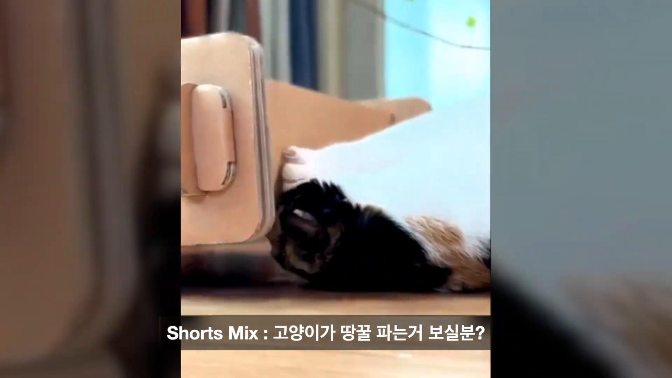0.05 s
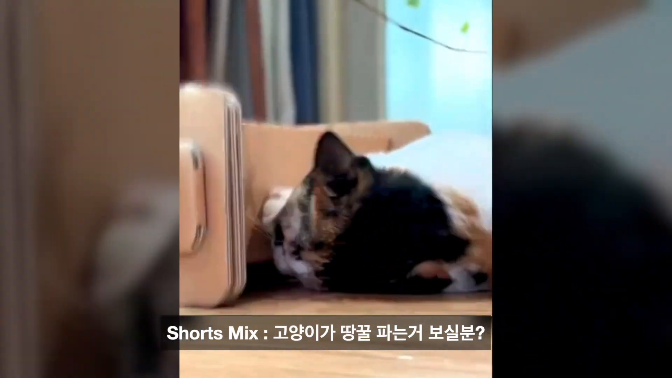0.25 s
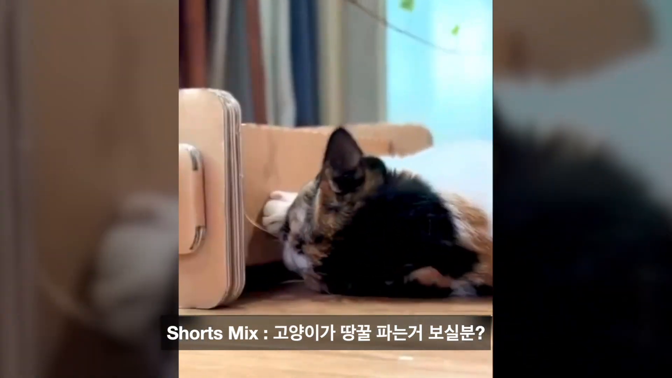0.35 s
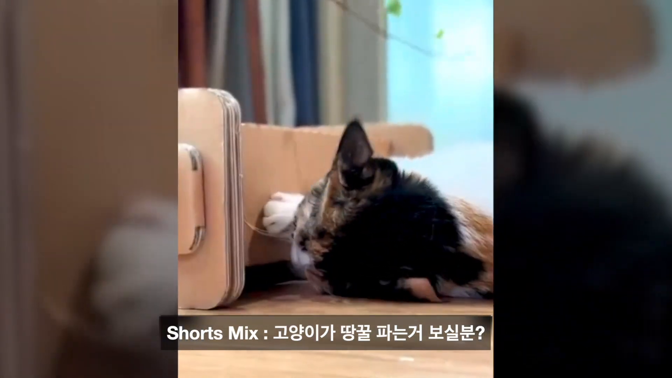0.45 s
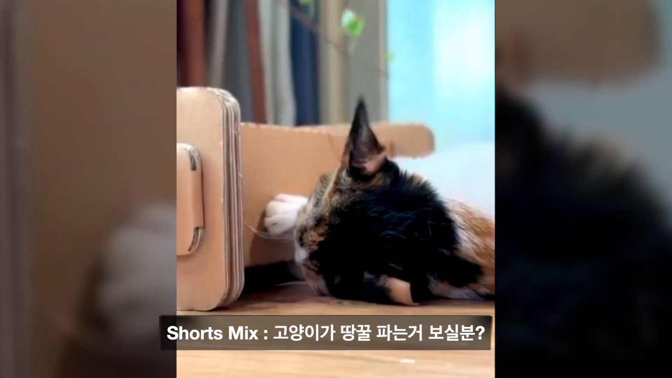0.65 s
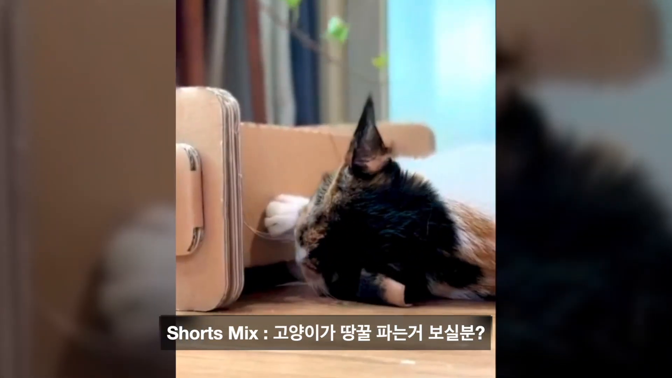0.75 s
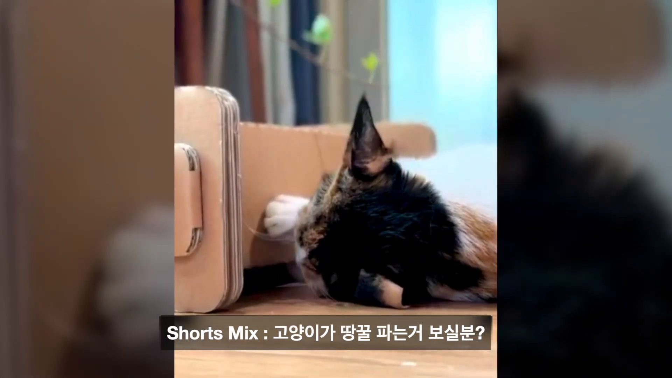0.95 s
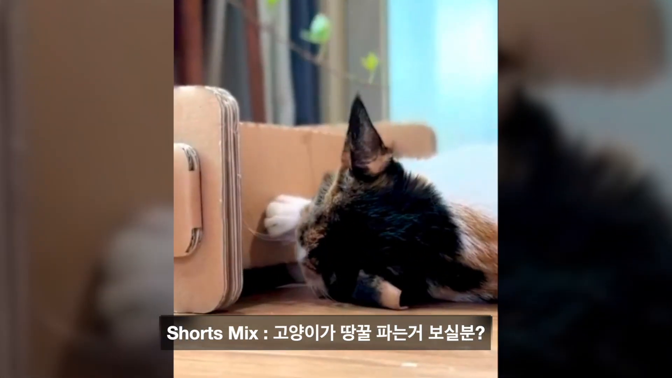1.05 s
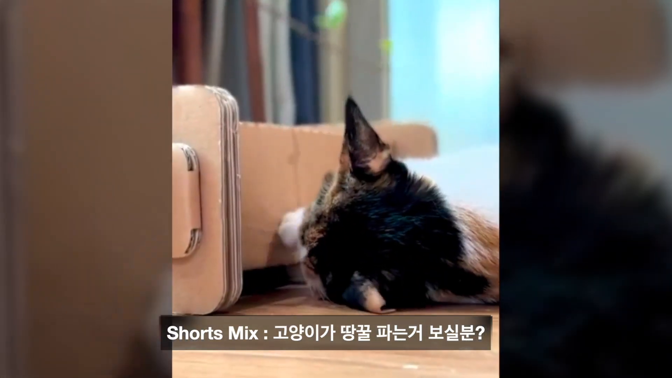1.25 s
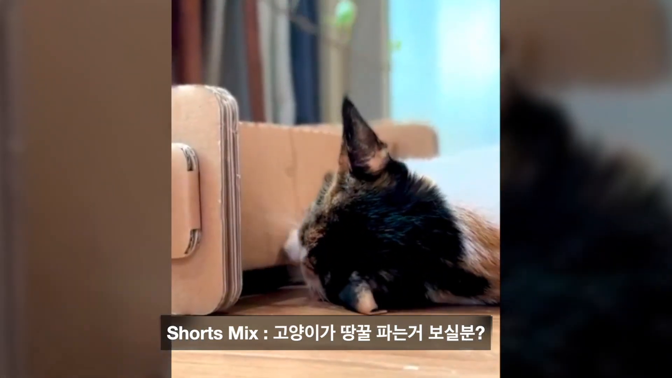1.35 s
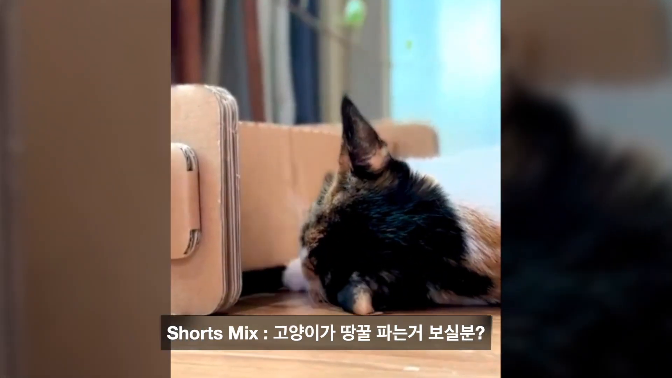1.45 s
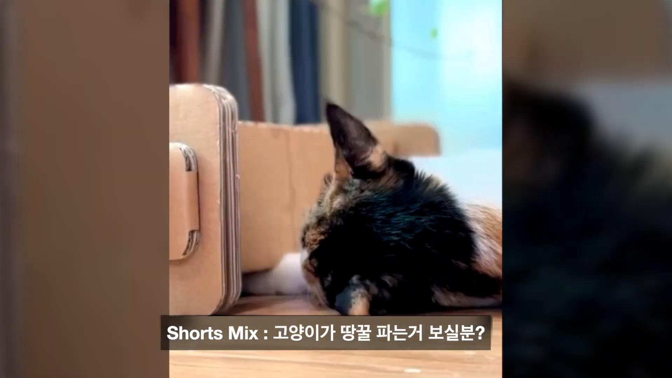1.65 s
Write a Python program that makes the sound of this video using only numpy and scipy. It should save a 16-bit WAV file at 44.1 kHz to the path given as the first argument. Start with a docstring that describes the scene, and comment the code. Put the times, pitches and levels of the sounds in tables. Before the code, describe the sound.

One hollow cardboard thump dominates early, led in by a quick rough claw drag, then fading into soft low bumps, fur rustle and a faint late tap; close microphone, small room, low room tone.

```python
"""Cat's paw knocks a cardboard box

A cat lying on a wooden floor drags a paw over a cardboard box, which knocks once, hollow and loud.
The knock is a cluster of contacts: a bend runs through the panel treble first, the panel modes ring,
and a short low sine is the hollow booming, which beats on in wavering low tones; so do soft bumps.
Scraping and fur are dense noise grains, claw ticks are resonant bursts; one light tap is a filtered
click. A small room of decaying noise answers, and a faint room tone lies beneath.
"""
import sys
import numpy as np
from scipy import signal
from scipy.fft import rfft, irfft, next_fast_len
from scipy.io import wavfile

SR = 44100
rng = np.random.default_rng(int(sys.argv[2]) if len(sys.argv) > 2 else 0)


def generate_wav(signal):
    """Clip the signal to [-1, 1] and save it as 16-bit WAV at the path in sys.argv[1]."""
    frames = np.transpose(np.atleast_2d(signal))
    scaled = np.clip(frames, -1, 1) * 32767
    pcm = np.round(scaled).astype(np.int16)
    wavfile.write(sys.argv[1], SR, pcm)


N = 74970
T = np.arange(N) / SR  # time axis, s
SIZE = next_fast_len(2 * N)  # transform length, padded
F = np.maximum(np.arange(SIZE // 2 + 1) * SR / SIZE, 1)  # frequency axis, Hz
BOOM_HZ = 83


def undb(db):
    """Decibels to gain."""
    return 10 ** (np.asarray(db) / 20)


def read(table, hz=F):
    """Read a two-column table, interpolating on a log-frequency axis."""
    f, v = np.array(table, float).T
    return np.interp(np.log(hz), np.log(f), v)


def through(x, response):
    """Filter by a frequency response."""
    return irfft(rfft(x, SIZE) * response, SIZE)[..., :N]


def causal(db):
    """Minimum-phase response with the given gain, by folding the cepstrum."""
    cepstrum = irfft(np.log(undb(db)), SIZE)
    cepstrum[1:SIZE // 2] *= 2
    cepstrum[SIZE // 2 + 1:] = 0
    return np.exp(rfft(cepstrum))


def delay(s):
    """Frequency response of a delay in seconds."""
    return np.exp(-2j * np.pi * F * s)


def unit(x):
    """Scale to rms 1."""
    return x / np.sqrt(np.mean(x ** 2))


def pan(db):
    """Left and right gains for a level difference, left over right."""
    return undb(np.array([[.5], [-.5]]) * db)


def ports(x):
    """Sound from the box reaches the left channel first."""
    right_lag_s = .00016
    return through(x, np.array([delay(0), delay(right_lag_s)]))


def diffuse(pair):
    """Mix two unrelated signals into a stereo field, alike in the bass and wide above."""
    # likeness of the two channels: f/Hz, correlation
    likeness = [(60, 1), (150, 0.9), (300, 0.8), (600, 0.09), (1200, -0.27), (2500, -0.19), (6000, 0.19)]
    c = np.clip(read(likeness), -.99, .99)
    mid, side = through(pair, np.sqrt(np.array([1 + c, 1 - c]) / 2))
    return np.array([mid + side, mid - side])


def noise():
    """Diffuse white noise."""
    return diffuse(rng.standard_normal((2, N)))


def fade(t60):
    """Exponential decay by 60 dB in t60 seconds."""
    return np.exp(-np.log(1000) * T / t60)


def echoes(t60):
    """Envelope of reflections: a gap, a quick rise and a decay, scaled to unit energy."""
    first_echo_s = 0.0016
    env = fade(t60) * np.clip(T / first_echo_s - 1, 0, 1)
    return env / np.sqrt(np.sum(env ** 2))


def room(x, wet_db=0):
    """Add quick reflections off floor and box, and a small room's tail decaying band by band."""
    # tail spectrum: f/Hz, level/dB
    tail = [(60, -11.5), (200, -15), (600, -11), (1100, -5.5), (1900, -11), (7000, -12)]
    # tail decay time: f/Hz, t60/s
    tail_t60 = [(80, 1), (250, 0.35), (900, 0.34), (2000, 0.24), (8000, 0.17)]
    early_db, early_t60_s = -12, .085
    response = undb(early_db) * noise() * echoes(early_t60_s)
    wash = noise()
    centres = np.geomspace(50, 12800, 9)  # Hz
    for hz, share in zip(centres, np.eye(len(centres))):
        # overlapping triangular bands
        band = through(wash, np.interp(np.log(F), np.log(centres), share))
        response = response + band * undb(read(tail, hz)) * echoes(read(tail_t60, hz))
    return x + undb(wet_db) * through(x, rfft(response, SIZE))


def crunch(db):
    """Fibres crushing at a contact smear its treble into brief crackle, keeping the colour."""
    decay_s, lower_edge_hz = 0.004, 1772
    fibres = unit(noise() * np.exp(-T / decay_s)) / np.sqrt(N)
    treble = 1 / (1 + lower_edge_hz / (1j * F)) ** 2
    # the click plus its crackle, at db against the click before the treble filter
    smear = 1 + undb(db) * rfft(fibres, SIZE) * treble
    # divide out the gain so that only the smearing in time remains
    return np.array([side / causal(20 * np.log10(np.abs(side))) for side in smear])


def friction(level, spectrum, rough_db=0.9, catch_hz=45):
    """Dense tiny slips of uneven size; the pressure of the stroke wavers as the paw catches."""
    grains_per_s, scatter_db, pan_db = 9000, 2.5, 0.66
    slips = (rng.random(N) < grains_per_s / SR) * undb(scatter_db * rng.standard_normal(N))
    grains = diffuse(slips * rng.standard_normal((2, N)))
    grains = unit(through(grains, causal(read(spectrum))))
    catch = unit(through(rng.standard_normal(N), 1 / (1 + (F / catch_hz) ** 2)))
    stroke_db = np.interp(T, *np.array(level).T) + rough_db * catch
    return grains * undb(stroke_db) * pan(pan_db)


def air():
    """Steady low room tone with a faint hiss: diffuse noise, coloured."""
    # room tone colour: f/Hz, relative level/dB
    colour = [(20, -9), (60, 2.5), (110, -3), (200, -4.5), (500, -11.5), (900, -23), (1500, -26),
              (2500, -35), (5300, -41.5), (6400, -33.5), (6900, -26.5), (7400, -44.5), (8500, -45),
              (11500, -35.5)]
    rms_db = -59
    return undb(rms_db) * unit(through(noise(), undb(read(colour))))


def scrape():
    """The paw scrapes the board: friction grains strongest in the low mids."""
    # stroke: t/s, level/dB
    stroke = [(0, -68.5), (.07, -59.5), (.12, -59.5), (.17, -49.5), (.235, -54), (.3, -48.5), (.5, -58.5),
              (.61, -61), (.7, -64.5), (.77, -63), (.9, -62.5), (1.0, -76.5), (1.12, -66.5), (1.3, -76.5),
              (1.5, -74), (1.6, -64.5), (1.7, -60)]
    # scrape colour: f/Hz, relative level/dB
    colour = [(80, -8.5), (300, -1), (650, 4), (1100, 0.5), (1450, -2), (1900, -4.5), (2400, -6),
              (3300, -22), (5000, -17), (12000, -37)]
    return friction(stroke, colour)


def fur():
    """Fur rustles: the same fine slips, strongest in the treble."""
    # rustle: t/s, level/dB
    rustle = [(0, -68.5), (.08, -67), (.17, -61), (.23, -54), (.3, -50.5), (.38, -64), (.46, -63.5),
              (.57, -68), (.64, -67.5), (.73, -78), (.82, -66), (.89, -64.5), (1.02, -71), (1.25, -75),
              (1.48, -79.5), (1.62, -70.5), (1.7, -70.5)]
    # fur colour: f/Hz, relative level/dB
    colour = [(1000, -12.5), (2500, 1), (4000, 0.5), (5200, -4), (6800, 5.5), (8000, 0), (9300, -12.5),
              (11000, -1.5), (13000, -33.5)]
    return friction(rustle, colour)


def drag():
    """The claws bite, slide roughly over the cardboard and let go as the box knocks."""
    # claw colour: f/Hz, relative level/dB
    colour = [(300, -5.5), (700, -5), (1200, -6.5), (1700, -3), (2300, 4.5), (2750, -1.5), (3300, -14.5),
              (4000, -11.5), (4800, -22), (12000, -23.5)]
    start_s, end_s, ramp_s, slide_db = 0.08, 0.21, 0.057, -54
    # t/s, level/dB
    stroke = [(start_s - ramp_s, -72), (start_s, slide_db - 6), (start_s + ramp_s, slide_db),
              (end_s, slide_db), (end_s + ramp_s, -100)]
    return friction(stroke, colour, rough_db=3.7)


def ticks(q=1.2):
    """A claw catches or scuffs, or the box gives a soft low bump: a short burst of crackle in one broad
    resonance."""
    # claw ticks and short scuffs, with soft low bumps at 0.032 s and 0.39 s: t/s, level at onset/dB, centre
    # f/Hz, decay constant/s
    tick_bursts = [(0.032, -48.5, 514, 0.011), (.0975, -38, 2000, .0025), (.2305, -52, 5000, .003),
                   (.7535, -55, 1400, .004), (.39, -49.5, 533, 0.028), (0.444, -62, 5000, .003),
                   (0.5295, -55, 5600, 0.0073), (0.6424, -59.5, 4200, 0.0063), (0.8735, -60, 5026, .005),
                   (1.2457, -60, 7760, 0.0024)]
    out = 0
    for s, db, hz, length in tick_bursts:
        resonance = 1 / (1 + 1j * q * (F / hz - hz / F)) ** 2
        burst = rng.standard_normal(N) * (T >= s) * np.exp(-np.abs(T - s) / length)
        # rms of a decay that starts at 1, so the level holds at the onset
        decay_rms = np.sqrt(length / 2 * SR / N)
        out = out + undb(db) * unit(through(burst, resonance)) * decay_rms
    return room(ports(out), wet_db=-0.5)


def low_swells(waver=0.11):
    """Low, unsteady swells: the knock's boom beating on after the hit, and soft padded bumps."""
    # boom beats and soft bumps: t/s, peak level/dB, centre f/Hz, time to peak/s
    swells = [(0.035, -50, 253.5, 0.017), (.2, -40.5, 90, 0.028), (0.313, -34.5, 89, .013),
              (0.341, -32, 85.4, 0.013), (.385, -39.5, 88, 0.01), (0.455, -47.5, 79.1, .018),
              (.535, -50, 225, 0.0097), (.568, -45, 93, 0.0083), (.765, -48.5, 77, 0.0093),
              (.875, -61.5, 185, 0.041), (1.08, -52.5, 70.3, 0.01), (1.345, -62, 59.8, 0.011),
              (1.437, -58, 60.4, 0.033)]
    out = 0
    for s, db, hz, length in swells:
        age = np.maximum(T - s, 0) / length
        envelope = age ** 2 * np.exp(2 * (1 - age))
        drift = unit(through(rng.standard_normal(N), 1 / (1 + (2 * F / hz) ** 2)))
        pitch = hz * (1 + waver * drift)
        tone = np.sin(2 * np.pi * np.cumsum(pitch * (T >= s)) / SR)
        out = out + undb(db) * envelope * tone
    return ports(out)


def knock():
    """Contacts crunch, spread into a falling chirp as they bend the panel, and its modes ring on."""
    # the knock and the box chattering as it settles: t/s, level/dB
    hits = [(.2430, -1.5), (0.2449, -12.5), (.2518, -14), (0.2612, -17.5), (.2685, -22.5), (0.2773, -17.5),
            (.2815, -18.5)]
    # colour of the blow: f/Hz, level/dB
    colour = [(25, 1), (60, 15.5), (120, 29), (250, 30.5), (500, 21.5), (850, 23.5), (1500, 16),
              (2400, 10.5), (3400, -5), (6000, 0), (11500, -9)]
    # stereo place of the blow: f/Hz, left over right/dB
    place = [(100, 1.5), (800, 2.5), (1400, -3.5), (2300, 6.5), (3500, 11.5), (7000, 1)]
    # panel modes: f/Hz, level over the blow/dB, t60/s
    modes = [(126.4, 0, 0.56), (169, 5, 0.18), (259.4, 2, 0.23), (305.2, 0, .2), (383, 4, 0.078),
             (491.3, 0.5, 0.22), (573, 2, .24), (724, 0.5, 0.33), (812.5, 7, 0.12), (922.5, -1, 0.24),
             (1009, 0.5, 0.25), (1150, -7, 0.19), (1323, -3, 0.095), (1525, -0.5, .09), (1841, -1, 0.13),
             (2242, -2.5, .12), (2396, -4.5, 0.11)]
    # travel time at 1 kHz; lower tones come later by this power, down to the boom
    bend_delay_s, bend_law = .0033, .52
    travel = bend_delay_s * (np.maximum(F, BOOM_HZ) / 1000) ** -bend_law
    # summing the delay over frequency gives the phase
    bend = np.exp(-2j * np.pi * np.cumsum(travel) * SR / SIZE)
    contacts = sum(undb(db) * delay(s) for s, db in hits)
    panel = 1  # the blow itself, then each mode
    for hz, db, t60 in modes:
        q = np.pi * hz * t60 / np.log(1000)
        panel = panel + undb(db) / (1 + 1j * q * (F / hz - hz / F))
    blow = causal(read(colour)) * contacts * crunch(db=5.5) * bend * panel * pan(read(place))
    return room(ports(irfft(blow, SIZE)[:, :N]))


def boom():
    """The hollow swells for a few cycles and is soon damped."""
    start_s, attack_s, hold_s, release_s, peak_db = .2455, 0.023, 0.016, 0.0071, -16
    age = T - start_s
    swell = np.clip(age / attack_s, 0, 1)
    damping = np.exp(-np.maximum(age - attack_s - hold_s, 0) / release_s)
    return ports(undb(peak_db) * swell * damping * np.sin(2 * np.pi * BOOM_HZ * age))


def taps():
    """A light contact with the board: a filtered click with a little crunch."""
    # light tap: t/s, level/dB
    touches = [(1.17, -3.5)]
    # tap colour: f/Hz, level/dB
    colour = [(60, -32), (300, -12.5), (800, -9.5), (1500, -7.5), (1950, -13.5), (2600, -23.5),
              (3600, -18.5), (5000, -25.5), (7000, -37), (11500, -37)]
    contacts = sum(undb(db) * delay(s) for s, db in touches)
    click = contacts * causal(read(colour)) * crunch(db=1.5)
    return room(ports(irfft(click, SIZE)[:, :N]), wet_db=2)


def scene():
    """Box, cat and room together."""
    background = air()
    rubbing = scrape() + fur() + drag() + ticks()
    box = low_swells() + knock() + boom() + taps()
    return background + rubbing + box


def record(dry):
    """A steep elliptic lowpass cuts the top."""
    top_hz, ripple_db, stop_db = 11500, .2, 70
    return signal.sosfilt(signal.ellip(8, ripple_db, stop_db, top_hz, fs=SR, output="sos"), dry)


dry = scene()
out = record(dry)
generate_wav(out)
```